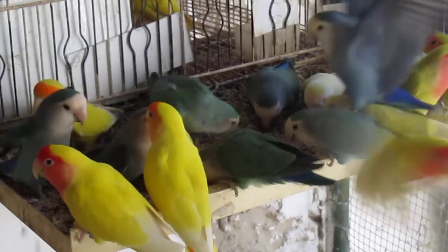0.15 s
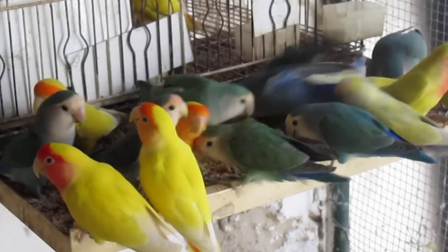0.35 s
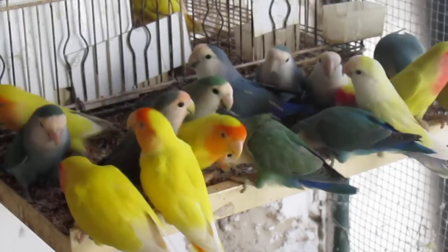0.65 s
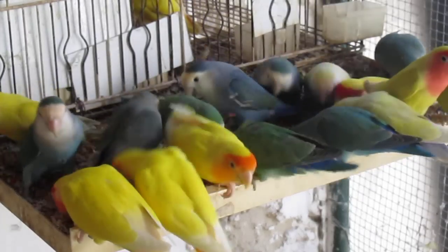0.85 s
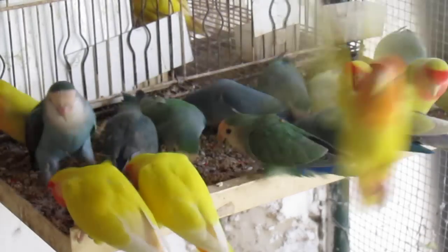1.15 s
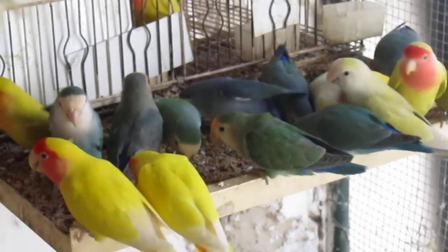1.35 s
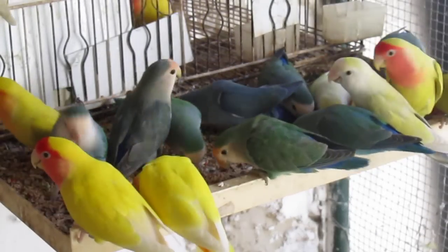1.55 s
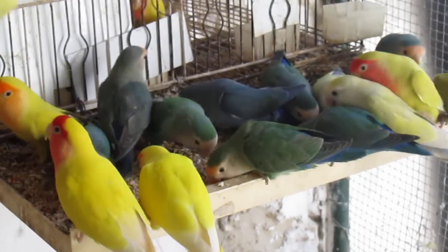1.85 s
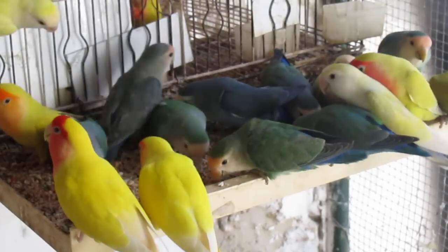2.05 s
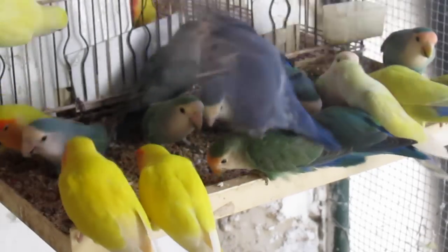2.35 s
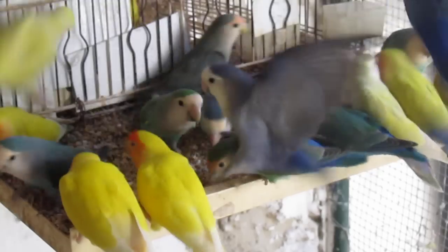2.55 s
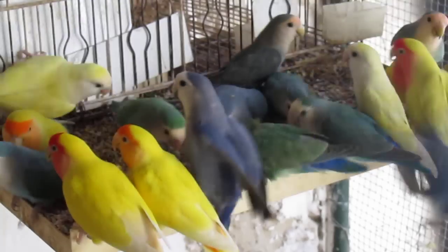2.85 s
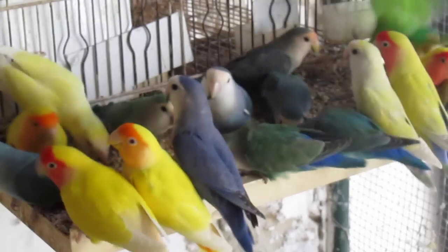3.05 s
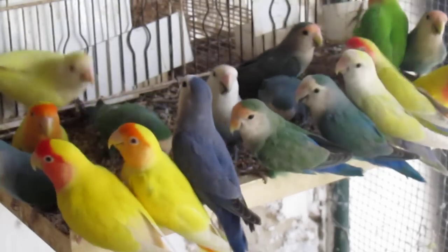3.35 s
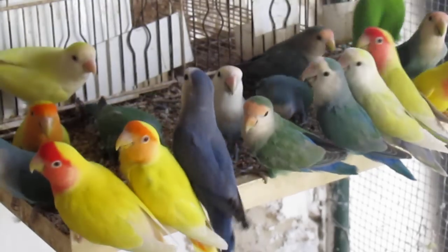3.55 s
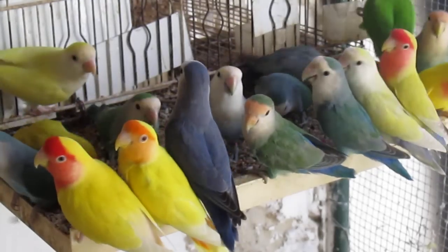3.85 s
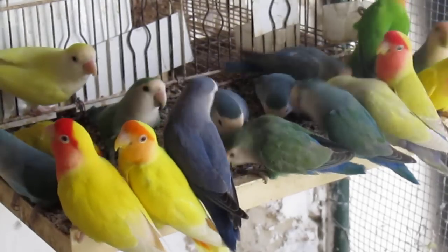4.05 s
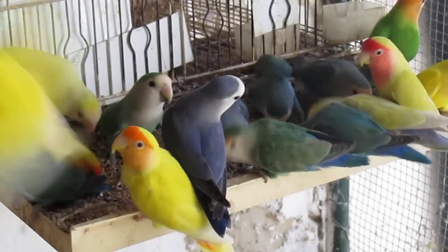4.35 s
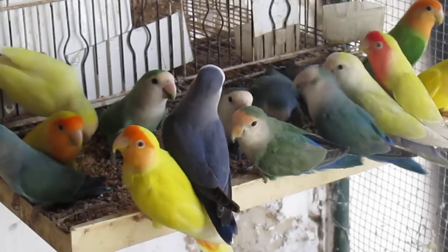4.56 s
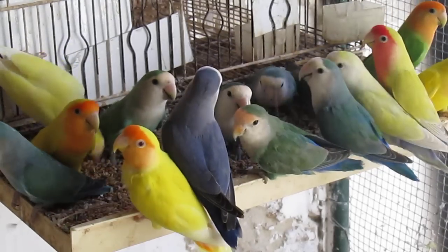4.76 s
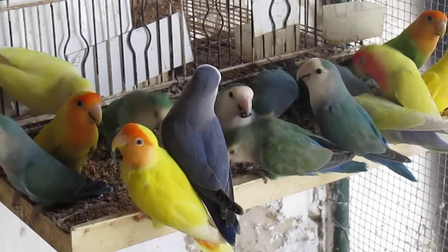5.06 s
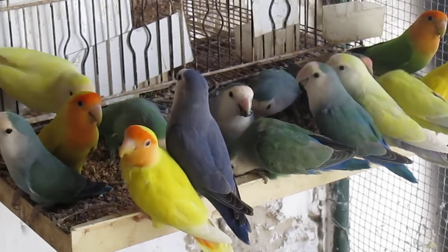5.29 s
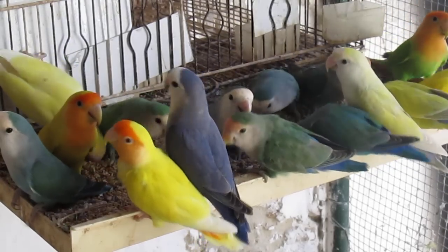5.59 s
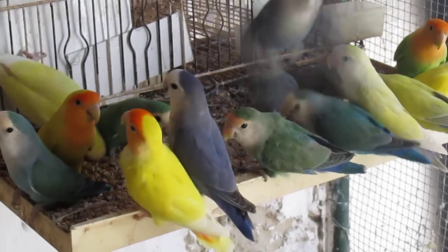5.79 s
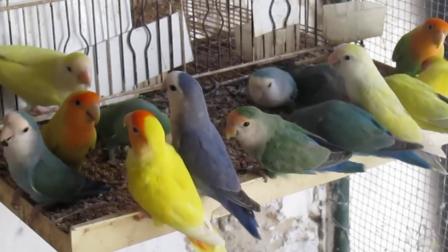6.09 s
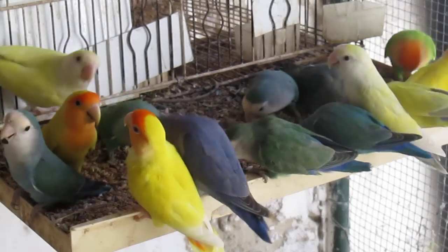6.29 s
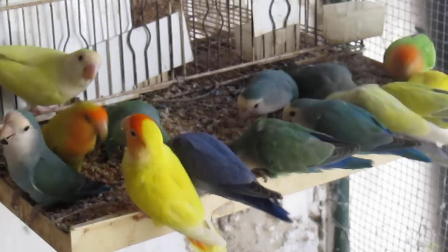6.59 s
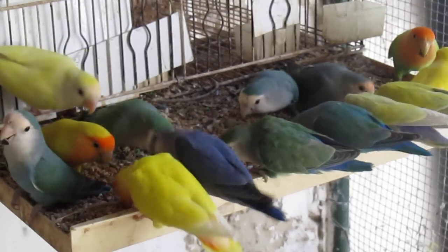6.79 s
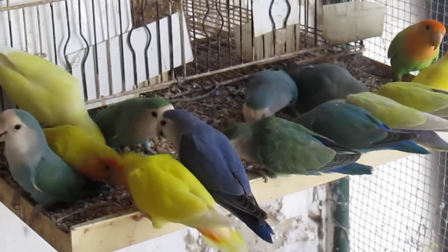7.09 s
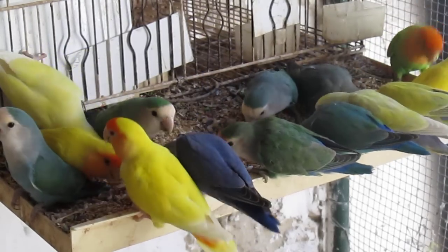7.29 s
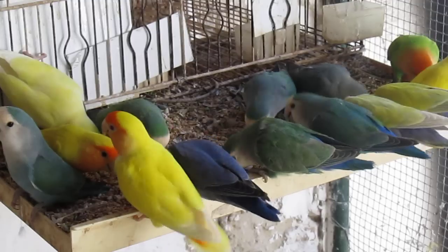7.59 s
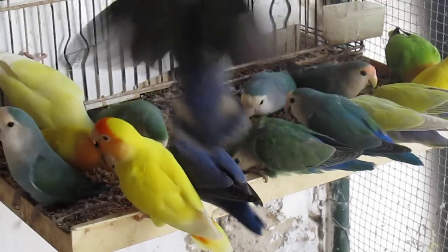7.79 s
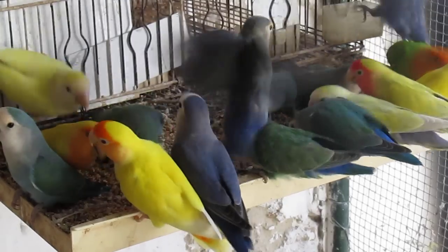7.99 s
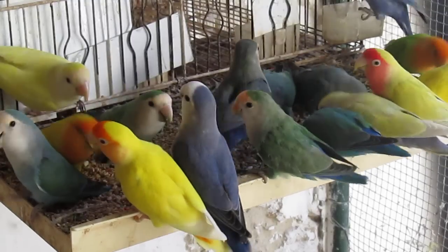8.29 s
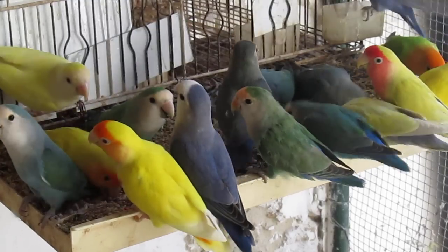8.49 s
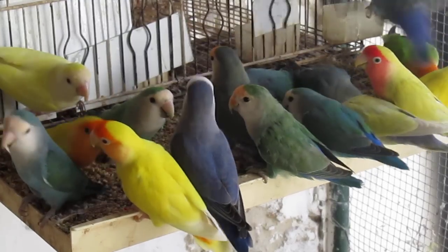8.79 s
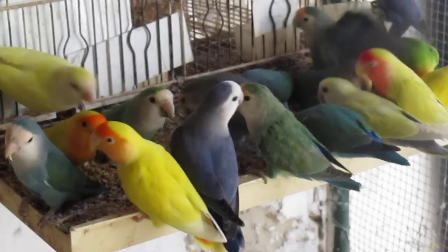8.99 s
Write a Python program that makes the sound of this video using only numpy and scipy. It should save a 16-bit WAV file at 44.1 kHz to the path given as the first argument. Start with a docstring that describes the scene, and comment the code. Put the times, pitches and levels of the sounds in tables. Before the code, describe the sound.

Lovebirds shriek and chirp in sharp bursts over a wooden seed tray, with short wing whirrs, husk cracks and rustling in an echoing aviary.

```python
"""Lovebirds shriek and chirp over seed on a wooden tray in a hard-walled aviary.
Each voice is a stack of harmonics with rasp and hiss; loud near birds overload the microphone.
Shaped noise makes short wing whirrs, rustling and scratching; feet thump and beaks crack husks.
One downdraught buffets the microphone, and the bass drops out for a moment after it."""
import sys
import numpy as np
from scipy import signal
from scipy.fft import rfft, irfft, next_fast_len
from scipy.io import wavfile
from scipy.ndimage import uniform_filter1d

SR = 44100
rng = np.random.default_rng(int(sys.argv[2]) if len(sys.argv) > 2 else 0)


def persist_wave(psi):
    """Save psi, clipped to +-1, as 16-bit WAV."""
    counts = np.round(np.clip(psi, -1, 1) * 32767).astype(np.int16)
    wavfile.write(sys.argv[1], SR, np.atleast_2d(counts).T)


N = 403074
EDGE_HZ = 15800  # top of the sound band


def amp(db):
    """Turns decibels into gain."""
    return np.exp(np.asarray(db) * (np.log(10) / 20))


def evened(x):
    """Scales to an rms of 1."""
    return x / np.sqrt(np.mean(x ** 2) + 1e-20)


def read(points, hz):
    """Reads a table between its points, on a log-frequency axis."""
    f, value = np.transpose(points)
    return np.interp(np.log(hz + 1), np.log(f + 1), value)


def add(mix, s, sound):
    """Mixes a sound in at time s, in seconds."""
    start = max(round(s * SR), 0)
    part = mix[..., start:][..., :sound.shape[-1]]
    part += sound[..., :part.shape[-1]]


def wobble(size, hz):
    """Random wavering of rms 1, up to about hz times a second."""
    b, a = signal.butter(2, hz, fs=SR)
    smooth = signal.lfilter(b, a, rng.standard_normal(size + SR // 40))
    return evened(smooth[-size:])  # leaves out the filter's start


def ports(pair, spectrum=None):
    """Blends two unrelated signals into sound from all around, as two close microphone ports hear it."""
    # How alike left and right are: f/Hz, likeness (1 = the same)
    likeness = [(60, 0.92), (130, 0.41), (300, 0.65), (700, 0.92), (3000, 0.92), (7000, 0.57),
                (11000, 0.12), (15000, 0.17)]
    length = next_fast_len(pair.shape[1], True)
    hz = np.fft.rfftfreq(length, 1 / SR)
    colour = 1 if spectrum is None else amp(read(spectrum, hz))
    a, b = rfft(pair, length) * colour
    same = np.clip(read(likeness, hz), -1, 1)
    mid = a * np.sqrt((1 + same) / 2)
    side = b * np.sqrt((1 - same) / 2)
    return irfft(np.array([mid + side, mid - side]), length)[:, :pair.shape[1]]


def noise(spectrum, grain=1):
    """Noise from all around, of rms 1, with a given colour and graininess."""
    return evened(ports(grain * rng.standard_normal((2, N)), spectrum))


def blow(rise, t60):
    """Half a second of loudness that swells and dies; t60 is the time to fall 60 dB, in seconds."""
    t = np.arange(SR // 2) / SR
    shape = (1 - np.exp(-(t / rise) ** 2)) * amp(-60 * t / t60)
    return shape / shape.max()


def bustle(air_db=3, rustle_db=5, flutter_db=1.5, clump_db=2, ticks_per_s=22, tick_db=3):
    """The whole flock stirs the air, rustles its feathers and scratches through loose husks."""
    # Stirred air over time: t/s, relative level/dB
    stir = [(0.0, -58), (0.61, -51), (0.91, -53), (2.01, -41), (2.54, -38.5), (2.67, -47), (2.98, -90),
            (3.49, -54.5), (3.84, -58.5), (4.81, -44), (5.47, -49), (6.06, -44.5), (6.8, -49.5),
            (7.71, -45), (7.97, -36), (8.22, -45.5), (8.78, -43.5), (9.14, -46.5)]
    # Feather rustle over time: t/s, relative level/dB
    rustling = [(0.0, -49), (0.35, -46.5), (1.09, -53.5), (2.49, -39.5), (2.65, -47.5), (3.1, -39.5),
                (3.49, -43), (3.74, -52.5), (4.35, -49), (4.56, -43.5), (5.04, -46.5), (5.58, -49),
                (5.98, -48), (7.13, -52.5), (8.04, -41), (8.25, -48), (8.6, -43.5), (9.14, -47.5)]
    # Colour of the stirred air: f/Hz, relative level/dB
    air_colour = [(12, -50.5), (20, -16.5), (97, -3.5), (139, -3.5), (276, -2), (316, -0.5), (382, -7),
                  (414, -3.5), (500, -8.5), (650, -6), (1100, -120)]
    # Colour of the feather rustle: f/Hz, relative level/dB
    rustle_colour = [(150, -20), (250, -22), (323, -17.5), (522, -6.5), (675, -4), (904, -4), (1000, -3.5),
                     (1390, -6), (2480, -6.5), (3810, -20), (6820, -13), (10300, -20.5), (15000, -38)]
    # Colour of the scratched husks: f/Hz, relative level/dB
    husk_colour = [(2500, -14), (4000, -1), (6000, 5.5), (8000, -2.5), (11000, -2.5), (14000, -15),
                   (15800, -29)]
    # Bouts of scratching: middle t/s, time from the middle to 37 % of the peak/s, relative level/dB
    scratches = [(0, 0.36, -51), (1.93, 0.12, -63.5), (2.534, 0.073, -44), (3.5, 0.46, -51),
                 (4.353, 0.067, -46), (5.01, 0.23, -49), (5.94, 0.068, -64), (6.698, 0.1, -62),
                 (7.71, .08, -42.5), (8.1, 0.11, -50), (9.12, 0.094, -37)]
    feeding_db = -57.5  # quiet pecking between the bouts

    t = np.arange(N) / SR
    air = np.interp(t, *np.transpose(stir))
    rustle = np.interp(t, *np.transpose(rustling))
    flutter = amp(flutter_db * wobble(N, 24))
    body = amp(air + air_db) * noise(air_colour)
    body += amp(rustle + rustle_db) * noise(rustle_colour)

    grains = amp(clump_db * wobble(N, 60))
    # small pecks and claw taps stand out of the scratching
    pecks = (rng.random(N) < ticks_per_s / SR) * amp(tick_db + 10 * rng.random(N))
    pecks = signal.oaconvolve(pecks, blow(rise=0.00043, t60=0.093))[:N]
    busy = amp(feeding_db)
    for s, half, db in scratches:
        busy = busy + amp(db) * np.exp(-((t - s) / half) ** 2)
    scratch = busy * noise(husk_colour, grains * (1 + pecks))
    return flutter * body + scratch


def wingbeats():
    """Each burst is a run of evenly spaced beats that grow or fade: t/s, level/dB, swish/dB, hum/dB."""
    # Bursts of wingbeats: start t/s, beats, rate in beats/s, relative level of first beat/dB,
    # change per beat/dB, feather swish relative to air/dB, tray hum relative to air/dB
    flutters = [ (0.037, 2, 5.15, -53.5, 2.5, 27, -3), (1.24, 3, 15, -27, -1, -4.5, -12),
                (2.176, 3, 14.6, -19.5, -4.5, -10, -11), (2.487, 5, 28, -15.5, -3, -8.5, -7),
                (3.589, 2, 13, -32.5, -21, 11.5, -2), (4.367, 4, 18.7, -18, -2.5, -6.5, -7),
                (4.55, 4, 23.5, -25.5, 2.45, -12, -3), (4.829, 3, 18, -16.5, -9, -8.5, -2),
                (5.714, 3, 19.5, -29.5, 3.5, -16, 2), (5.893, 3, 22.5, -29.5, .3, -21, 7),
                (6.062, 2, 22, -32, 2.5, -3, 8), (6.18, 3, 24, -29.5, -2, -3.5, -5),
                (6.58, 2, 26, -25.5, -8, -19, -14), (7.927, 4, 25, -22, -0.5, -23, -1),
                (8.43, 3, 17.7, -21.5, -0.5, -13, -12)]
    beats = []
    for s, count, rate, db, step_db, feather_db, hum_db in flutters:
        for k in range(round(count)):
            beats.append((s + k / rate, db + k * step_db, feather_db, hum_db))
    return beats


def wings(stroke_db=-12, swish_db=-12, brush_db=-10, hollow_db=-10, hollow_hz=510, lead=0.00601):
    """Each downstroke puffs air, sets the hollow of the tray humming and swishes the flight feathers."""
    # Stiff feathers slapping and brushing past each other: t/s, relative level/dB
    brushes = [(7.6864, -57), (7.7644, -34), (7.8344, -37), (7.874, -12.5), (7.9044, -23)]
    # Colour of the feather swish: f/Hz, relative level/dB
    swish_colour = [(120, -41), (200, -43.5), (624, -16.5), (1220, -10), (1540, -4.5), (2330, -21),
                    (3120, -8.5), (4090, -31), (6190, -19.5), (15000, -58)]
    # Colour of the puffs of air: f/Hz, relative level/dB
    puff_colour = [(47, -42), (80, -3.5), (333, -14.5), (413, -0.5), (502, 4.5), (774, -3.5), (1190, -8.5),
                   (1650, -19), (2380, -13.5), (4000, -32), (7480, -29.5), (10300, -35), (14000, -67)]

    puff, hollow, swish = np.zeros((3, N))
    t = np.arange(SR // 2) / SR
    for s, db, feather_db, hum_db in wingbeats():
        # puff and hum start a few milliseconds (lead, in seconds) before the swish
        add(puff, s - lead, amp(db + stroke_db) * blow(rise=0.0041, t60=0.27))
        detune = rng.uniform(0.85, 1.07)
        hum = blow(rise=0.0028, t60=0.24) * np.sin(2 * np.pi * hollow_hz * detune * t)
        add(hollow, s - lead, amp(db + hum_db + hollow_db) * hum)
        add(swish, s, amp(db + feather_db + swish_db) * blow(rise=0.002, t60=0.41))
    for s, db in brushes:
        add(swish, s - .002, amp(db + brush_db) * blow(rise=.002, t60=0.43))
    grain = amp(1.6 * wobble(N, 600))
    return puff * noise(puff_colour) + hollow + swish * noise(swish_colour, grain)


def call_pitch(t, along, arch, first_hz, last_hz, rough):
    """Pitch in Hz: slides fast at first and then settles, with a scooped start and a random bend."""
    settle, lift = 1.5, .015  # curve of the slide; rise from the ends to the middle, as a share
    scoop, scoop_s = 0.0585, 0.00418  # starts low by this share and snaps up
    bend, bend_hz = 0.01238, 30.46  # wavers by this share (rms), up to about this often a second
    warble, warble_hz = 0.0506, 71.1  # the roughest calls also lurch by this share (rms)
    pitch = last_hz + (first_hz - last_hz) * (1 - along) ** settle
    pitch = pitch * (1 + lift * (arch - .5))
    pitch = pitch * (1 - scoop * np.exp(-t / scoop_s) + bend * wobble(SR // 2, bend_hz)[:len(t)])
    return pitch * (1 + warble * rough * wobble(len(t), warble_hz))


def call(row, throat, rasp, rasp_hz, half_db, hiss_db, drift=0.00632, shimmer=0.54,
         beak_db=12, beak_width_hz=850, pipe_width_hz=700):
    """The voice organ sings harmonics and rasps when pushed; beak and windpipe each shape a band."""
    start, length, level_db, swell_db, first_hz, last_hz, rough, beak, bright_db, pipe_hz, pipe_db = row
    attack_s, release_s, ends_db = 0.0047, .005, 0.5  # fades in and out; small lift toward the ends
    t = np.arange(0, length, 1 / SR)
    along, rough, size = t / length, np.clip(rough, 0, 1), len(t)
    arch = np.sin(np.pi * along)
    pitch = call_pitch(t, along, arch, first_hz, last_hz, rough)
    jitter = drift * wobble(size, 106.5) + rasp * rough * wobble(size, rasp_hz)
    phase = 2 * np.pi * np.cumsum(pitch * (1 + jitter)) / SR

    voice = np.zeros(size)
    for k in np.arange(1, min(8, EDGE_HZ / pitch.min()), .5):
        hz = k * pitch
        colour_db = read(throat, hz) + bright_db * np.log2(k)
        colour_db += beak_db / (1 + ((hz - beak) / beak_width_hz) ** 2)
        colour_db += pipe_db / (1 + ((hz - pipe_hz) / pipe_width_hz) ** 2)
        # a rough voice doubles its period, which adds lines halfway between the harmonics
        strength = amp(half_db) * rough if k % 1 else 1
        flicker = 1 + shimmer * rough * wobble(size, 280)
        voice += strength * amp(colour_db) * (hz < SR / 2) * flicker * np.sin(k * phase)
    voice /= np.sqrt(abs(uniform_filter1d(voice ** 2, size=400)) + 1e-9)  # evens out the loudness

    throat_gain = amp(read(throat, np.fft.rfftfreq(size, 1 / SR)))
    hiss = irfft(rfft(rng.standard_normal(size)) * throat_gain, size)
    hiss = evened(signal.sosfilt(signal.butter(4, 2000, "high", fs=SR, output="sos"), hiss))

    effort_db = level_db + swell_db * (along - .5) + ends_db * (1 - arch)
    judder_db = 3 * rough * wobble(size, 200)  # a harsh voice comes in uneven bursts
    fade = np.clip(np.minimum(t / attack_s, (length - t) / release_s), 0, 1)
    gate = np.sin(np.pi / 2 * fade) ** 2
    return start, amp(effort_db + judder_db) * gate * (voice + amp(hiss_db) * rough * hiss)


def chirps():
    """Far birds call softly, with more hiss in the voice."""
    # Far birds, one row a chirp: start t/s, length/s, relative level/dB, first f/Hz, last f/Hz,
    # roughness (0-1), beak resonance f/Hz, brightness/dB per octave
    chirp_rows = [ (0.282, 0.047, -35.5, 3370, 3220, 0.78, 3300, 2),
                  (0.349, 0.022, -32, 3400, 3080, 0.26, 3200, -2),
                  (1.343, 0.073, -35.5, 1810, 1490, 0.56, 2800, -7.5),
                  (1.455, .035, -38.5, 2960, 2805, 0.19, 6400, 3.5),
                  (2.156, 0.037, -39.5, 2700, 2534, 0.26, 2600, 4),
                  (2.408, .05, -27.5, 3850, 3780, 0.46, 6700, -4),
                  (2.436, .027, -26.5, 2090, 1946, 0.42, 2100, 8),
                  (2.459, 0.036, -29, 2984, 2520, 0.52, 2800, 0),
                  (2.52, 0.074, -36.5, 3136, 3350, 0.84, 3300, 0),
                  (2.746, 0.026, -39, 3340, 3300, 0.23, 6600, -21.5),
                  (2.768, 0.019, -18, 5900, 5175, 0.1, 5500, -6),
                  (2.776, 0.027, -27.5, 4420, 4290, 0.34, 4300, -3),
                  (2.853, 0.054, -35.5, 3410, 3740, 0.77, 3000, 1),
                  (2.892, 0.05, -31, 3820, 3495, 0.36, 6440, -9.5),
                  (2.963, 0.047, -36.5, 3570, 3460, 0.56, 3600, -8),
                  (3.542, 0.041, -36.5, 4210, 4200, .03, 4850, 9.5),
                  (5.52, 0.027, -34.5, 3060, 4600, 0, 7800, -1),
                  (5.54, 0.02, -32, 4220, 2920, .35, 3930, 4.5),
                  (5.555, 0.024, -42, 1790, 1617, 0.4, 1750, 3),
                  (5.734, 0.034, -46.5, 3250, 3250, 0.13, 6900, -9),
                  (5.806, 0.092, -41.5, 2903, 3050, 0.4, 3320, 5.5),
                  (6.422, 0.034, -40, 3630, 2750, 0.59, 3800, 1.5),
                  (7.389, .05, -37, 1199, 1100, 0.54, 1100, -13),
                  (7.456, 0.045, -22, 3770, 3633, 0.17, 6900, -6),
                  (8.122, .025, -39.5, 3460, 3340, 0.5, 6900, 14),
                  (8.249, .02, -40.5, 3700, 3360, .6, 6920, 22),
                  (8.554, 0.031, -33.5, 2960, 2660, .55, 2900, 3.5),
                  (8.654, 0.056, -34, 3144, 3340, 0.55, 3200, 0.5),
                  (8.877, 0.052, -30, 3250, 3224, 0.24, 5680, -3),
                  (8.925, 0.025, -31.5, 2234, 2090, 0.64, 2300, -12),
                  (9.033, 0.028, -31.5, 3770, 3710, 0.1, 4800, 4),
                  (9.063, .026, -28, 3580, 3680, 0.22, 5000, 1)]
    # Throat colour of a soft call: f/Hz, relative level/dB
    soft_throat = [(1000, -20), (1900, 6), (3200, 0), (4800, -5.5), (7000, 0.5), (8500, -7), (11000, -10.5),
                   (15000, -42), (20000, -55)]
    # chirps fade a little and share one windpipe resonance
    swell_db, pipe_hz, pipe_db = -1.5, 6960, 5
    out = np.zeros(N)
    for s, length, db, *voice in chirp_rows:
        row = (s, length, db, swell_db, *voice, pipe_hz, pipe_db)
        add(out, *call(row, soft_throat, rasp=0.1214, rasp_hz=320, half_db=-12, hiss_db=-4.5))
    return out


def shrieks():
    """Near birds call at full voice, with strong harmonics and little hiss."""
    # Near birds, one row a shriek: start t/s, length/s, relative level/dB, swell start to end/dB,
    # first f/Hz, last f/Hz, roughness (limited to 0-1 in use), beak resonance f/Hz,
    # brightness/dB per octave, windpipe resonance f/Hz, windpipe strength/dB
    shriek_rows = [ (0.364, 0.022, -11.5, 6, 2635, 2734, 0.25, 5260, -2, 8800, -6),
                   (0.381, 0.043, -8, 1, 3116, 3210, 0.68, 4800, 1.5, 6500, 2.5),
                   (0.427, 0.038, -9, -2, 3293, 3314, 0.18, 3400, 3, 6600, 6),
                   (0.467, 0.093, -11.5, -1, 3304, 3310, 0.77, 5100, 1, 3300, -1.5),
                   (0.447, 0.054, -13.5, 5, 4040, 4270, 0.11, 4400, -1, 8300, 7),
                   (0.527, 0.048, -6.5, 1, 4650, 4500, 0.34, 4700, -2, 8100, -1),
                   (0.666, 0.015, -17.5, 7, 2330, 2434, 0.9, 4600, 0, 2600, 5),
                   (.676, .06, -9.5, 1.5, 2372, 2510, 0.56, 5400, 1.5, 6560, 11),
                   (.722, 0.049, -15.5, 3, 2480, 2520, 0.58, 3600, -0.5, 6240, 5),
                   (.768, 0.066, -17, -7, 2605, 2685, 0.78, 3840, 2, 6400, 3),
                   (0.837, 0.06, -21.5, 2, 2940, 3120, 0.67, 3100, -0.5, 8400, 1),
                   (0.804, 0.064, -14.5, 0, 4620, 4074, 0.12, 4370, 3, 8400, -2),
                   (.899, 0.028, -13.5, -3, 1853, 1814, 0.27, 5470, 3, 5500, 5),
                   (0.92, 0.084, -19, -7.5, 1853, 1824, 0.73, 3280, 1.5, 3080, 23),
                   (0.935, 0.044, -19, -3, 3960, 3620, 0.28, 7700, -1, 6700, -8),
                   (1.002, 0.036, -14.5, -17, 3350, 3344, 0.08, 3320, -6, 8800, -5),
                   (1.02, 0.05, -16, -13.5, 2100, 2266, 0.57, 4840, 3, 7500, 6),
                   (1.04, 0.022, -13.5, -5, 2530, 2600, 0.05, 5100, -3, 2600, 11),
                   (1.054, 0.046, -13, 7, 3270, 3068, 0.7, 4720, 0.5, 6300, 1),
                   (1.108, 0.099, -14.5, -6.5, 4215, 3905, 0.34, 4400, -2, 7900, 7.5),
                   (1.123, 0.057, -28.5, 0, 2324, 2174, 0.6, 2300, 0, 7700, -10),
                   (3.098, 0.036, -12.5, 11, 2577, 2317, 0.34, 5200, -2.5, 8400, 12),
                   (3.13, .04, -7, -5, 2234, 2201, 0.16, 6600, 3, 9100, -3),
                   (3.251, .043, -9, 5, 2380, 2180, 0.22, 6500, 3, 2300, 9.5),
                   (3.288, 0.037, -7, -14, 2215, 2193, 0.22, 6500, 4, 2250, 0.5),
                   (3.288, 0.048, -15, -18, 5070, 5270, 0.41, 5200, -6.5, 9900, 16),
                   (3.996, 0.029, -16.5, 9, 2314, 2256, 0.14, 5300, 2, 7500, 11),
                   (4.017, 0.029, -8.5, 7, 2509, 2594, 0.14, 5500, 0, 7300, -5),
                   (4.04, 0.024, -6.5, 7.5, 2291, 2272, .42, 6700, 5.5, 9940, -28),
                   (4.057, 0.025, -12, -2, 2548, 2553, 0.17, 5140, -2, 9900, -6),
                   (5.044, 0.0137, -17, 2, 2216, 2144, .6, 3640, -2, 2100, 5.5),
                   (5.053, 0.053, -12, -1, 1960, 2005, 0.11, 6230, 5.5, 2000, 10.5),
                   (5.095, 0.033, -17, -4, 1866, 1918, 0.22, 6140, 2.5, 2000, 9.5),
                   (5.179, 0.011, -11.5, -3, 2925, 2940, .9, 4000, 0.5, 8000, -3),
                   (5.19, 0.03, -5.5, -9, 3540, 3285, 0.33, 6800, 17.5, 2670, 15),
                   (5.198, .03, -5.5, -19, 5900, 2716, 0.61, 5050, 7.5, 2670, 9),
                   (5.222, .015, -10.5, 5, 2740, 3074, 0.24, 2900, -1.5, 6200, 8),
                   (5.237, 0.018, -5.5, -12, 2265, 2512, .3, 4860, 3, 2670, -5),
                   (5.258, 0.041, -11.5, -11, 2720, 2584, 0.49, 5330, 5.5, 2670, 13.5),
                   (5.293, 0.052, -15.5, 1, 2490, 2373, 0.72, 5620, 2, 2480, 5),
                   (6.784, 0.014, -19, 9, 1830, 1933, 0.5, 5600, -1, 3480, 3),
                   (6.791, 0.034, -21, -12, 2334, 2300, 1.11, 6500, 0, 2000, 8),
                   (6.799, 0.03, -18.5, 3, 4050, 4340, 0.32, 4200, 6, 8400, 6.5),
                   (6.802, 0.029, -10, -1, 2440, 2462, 0.29, 5000, 2, 9800, 10.5),
                   (9.084, 0.021, -9, 9, 2014, 2080, 0.63, 4360, 3, 8350, 8.5),
                   (9.103, 0.044, -15, -14, 2440, 2380, 0.64, 4730, -3.5, 8400, 14)]
    # Throat colour of a loud call: f/Hz, relative level/dB
    loud_throat = [(1000, 3), (1900, -2), (3000, -1.5), (5000, 0.5), (7000, -0.5), (9500, -3.5),
                   (12000, -12), (15000, -28), (20000, -63)]
    out = np.zeros(N)
    for row in shriek_rows:
        add(out, *call(row, loud_throat, rasp=0.0742, rasp_hz=490, half_db=-3.5, hiss_db=-18.5))
    return out


def tray(knock_db=-7):
    """A landing knocks the boards, which ring briefly."""
    # Birds landing on tray and perches: t/s, relative level/dB, ring f/Hz, time to fall 60 dB/s
    thumps = [(1.71, -25.5, 326, 0.17), (2.579, -16.5, 610, 0.05), (4.831, -15.5, 620, 0.016),
              (8.511, -21.5, 538, 0.07)]
    out, t = np.zeros(N), np.arange(SR // 2) / SR
    for s, db, hz, t60 in thumps:
        ring = blow(rise=0.00049, t60=t60) * np.sin(2 * np.pi * hz * t)
        knock = amp(knock_db) * blow(rise=0.0011, t60=0.011) * wobble(len(t), 1100)
        add(out, s, amp(db) * (ring + knock))
    return out


def seeds(crack_db=-4, width_hz=4000):
    """A husk splits with one bright snap: a very short burst of noise around one pitch."""
    # Husks cracking in beaks: t/s, relative level/dB, centre f/Hz
    cracks = [(1.787, -22, 9000), (1.8382, -22, 4500), (1.8936, -24, 7370), (1.9622, -12, 8200),
              (2.3585, -26, 5280), (2.652, -35, 4760), (3.455, -22, 6450), (3.559, -15, 4060),
              (3.6122, -20, 4060), (4.5655, -29, 5680), (4.9818, -19, 6830), (5.5122, -14.5, 6950),
              (5.7616, -17, 10000), (5.9504, -25, 7130), (6.085, -21.5, 5780), (6.6837, -46, 4900),
              (7.298, -20, 9450), (7.972, -14, 6810), (8.1245, -18, 7040), (8.3818, -24, 9500)]
    out = np.zeros(N)
    for s, db, hz in cracks:
        snap = blow(rise=.0001, t60=0.014) * rng.standard_normal(SR // 2)
        b, a = signal.iirpeak(min(hz, EDGE_HZ), hz / width_hz, SR)
        snap = signal.lfilter(b, a, snap)
        add(out, s, amp(db + crack_db) * snap / abs(snap).max())
    return out


def gust(common_db=-8):
    """A close bird's downdraught buffets the two microphone ports, mostly in opposite directions."""
    # Colour of the buffeting: f/Hz, relative level/dB
    gust_colour = [(15, -40), (25, -5), (223, 2), (543, -18), (618, -27), (762, -32), (854, -45),
                   (1200, -38), (1560, -68), (2640, -120)]
    start_s, length_s, level_db = 2.612, 0.088, -19.5
    gain = amp(read(gust_colour, np.arange(SR // 2 + 1)))  # one second of noise has 1 Hz steps
    common, opposed = (evened(irfft(rfft(rng.standard_normal(SR)) * gain, SR)) for _ in range(2))
    swell = signal.windows.hann(round(length_s * SR)) * amp(level_db)
    both = amp(common_db) * common + np.outer([1, -1], opposed)
    out = np.zeros((2, N))
    add(out, start_s, swell * both[:, :len(swell)])
    return out


def aviary(x, wet_db, early_db, gap=0.0046):
    """Direct sound plus dense wall echoes, strongest at first, each band dying at its own speed."""
    # Echo decay: f/Hz, time to fall 60 dB/s
    room_t60 = [(200, 0.81), (1000, 0.37), (2500, 0.43), (5000, 0.38), (8000, 0.33), (14000, 0.18)]
    # Phase between the microphone ports for direct sound: f/Hz, left lead/radians
    port_phase = [(2000, 0), (6500, 0.85), (9000, 1), (10500, 2.04), (11500, 1.5), (14000, 2.5)]

    t = np.arange(SR // 2) / SR
    # echoes at random moments, about 2500 a second, after a gap in seconds
    taps = rng.standard_normal((2, len(t))) * (rng.random((2, len(t))) < 2500 / SR) * (t > gap)
    taps = taps * (1 + amp(early_db) * np.exp(-t / 0.03))
    hz, when, z = signal.stft(taps, SR, nperseg=256)
    decay = amp(-60 * when / read(room_t60, hz)[:, None])
    tail = evened(ports(signal.istft(z * decay, SR, nperseg=256)[1]))
    echoes = signal.fftconvolve(x[None], tail, axes=1)[:, :N] / np.sqrt(tail.shape[1])

    padded = next_fast_len(N, True)
    lead = read(port_phase, np.fft.rfftfreq(padded, 1 / SR))
    turn = np.exp(.5j * np.outer([1, -1], lead))
    direct = irfft(rfft(x, padded) * turn, padded)[:, :N]
    return direct + amp(wet_db) * echoes


def scene():
    """Near and far birds, wings, tray and seed."""
    near = amp(-0.5) * aviary(shrieks(), wet_db=-2.5, early_db=-5.5)
    far = amp(2.5) * aviary(chirps(), wet_db=-4.5, early_db=-17.0)
    knocks = aviary(tray() + seeds(), wet_db=-1.5, early_db=11)
    return near + far + knocks + wings() + bustle() + gust()


def record(dry, ceiling=1.23, knee=5):
    """The bass dips once, the loudest peaks are squashed by overload, and the treble ends steeply."""
    # The bass drops out and creeps back: t/s, low cut f/Hz
    bass_edge = [(2.69, 10), (2.725, 700), (2.85, 230), (3.05, 230), (3.2, 30), (3.8, 8.3)]
    hz, t, z = signal.stft(dry, SR, nperseg=1024)
    cut_hz = np.interp(t, *np.transpose(bass_edge))
    z = z / np.sqrt(1 + (cut_hz / (hz[:, None] + 1)) ** 4)
    x = signal.istft(z, SR, nperseg=1024)[1][:, :N]
    x = x / (1 + abs(x / ceiling) ** knee) ** (1 / knee)
    treble_cut = signal.firwin(255, EDGE_HZ, window=("kaiser", 7), fs=SR)
    return signal.oaconvolve(x, treble_cut[None], "same")


dry = scene()
out = record(dry)
persist_wave(out)
```